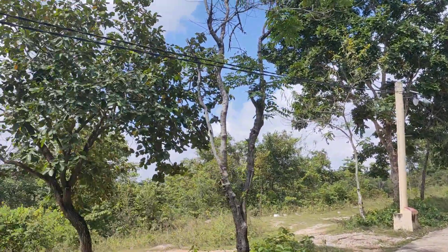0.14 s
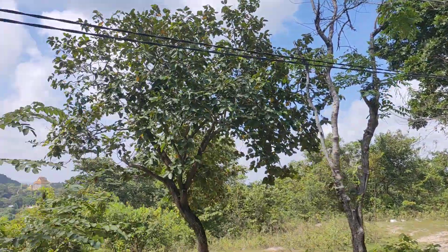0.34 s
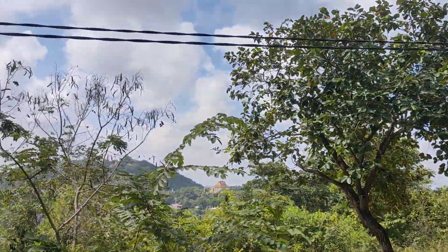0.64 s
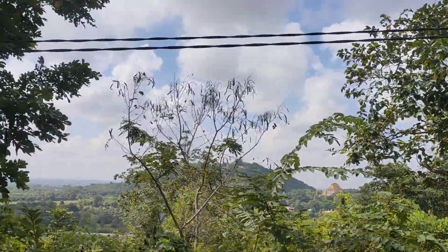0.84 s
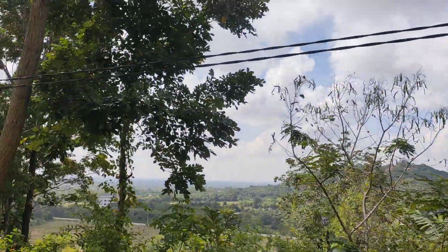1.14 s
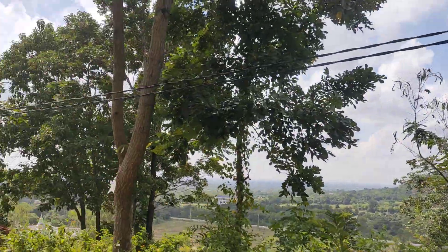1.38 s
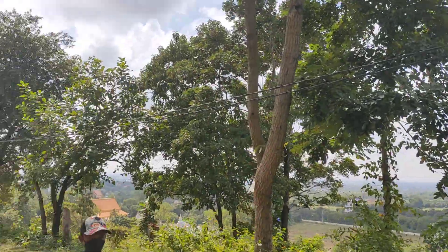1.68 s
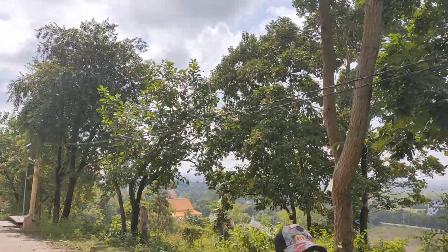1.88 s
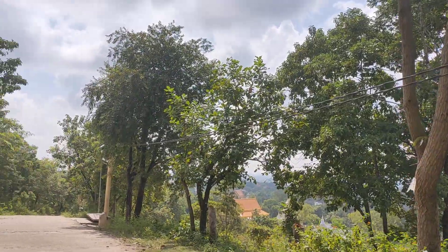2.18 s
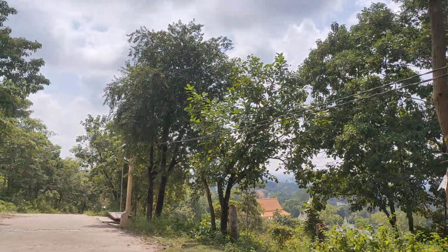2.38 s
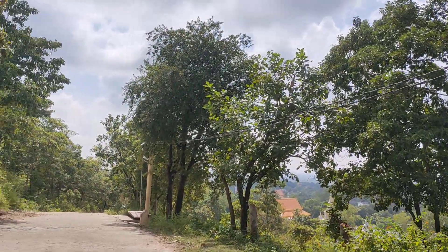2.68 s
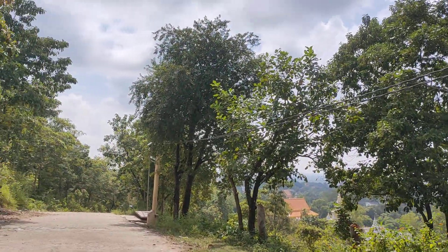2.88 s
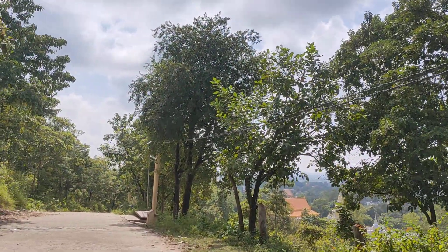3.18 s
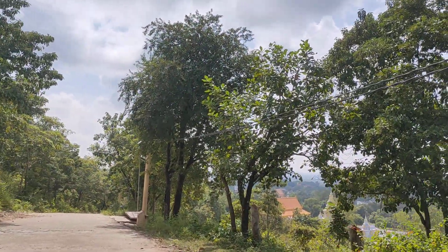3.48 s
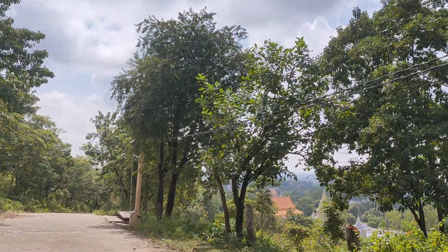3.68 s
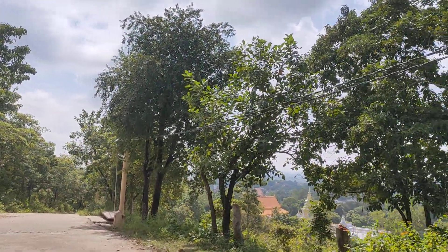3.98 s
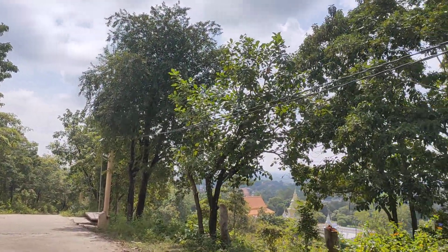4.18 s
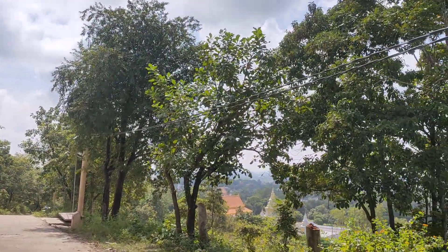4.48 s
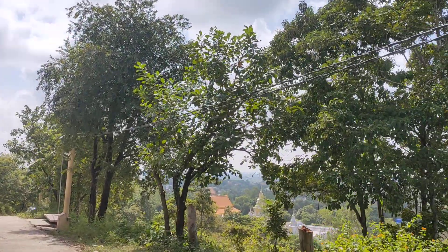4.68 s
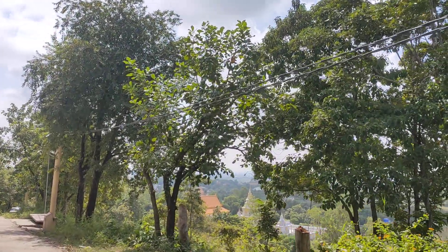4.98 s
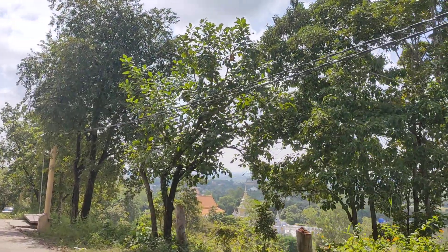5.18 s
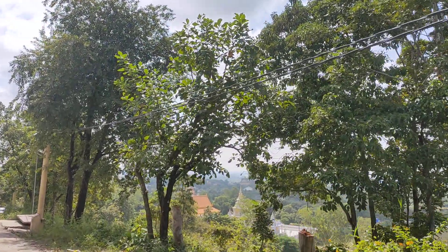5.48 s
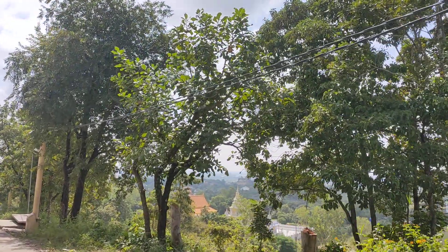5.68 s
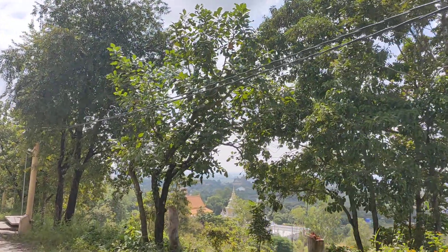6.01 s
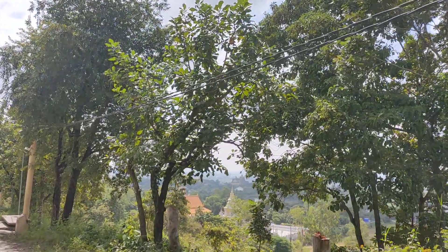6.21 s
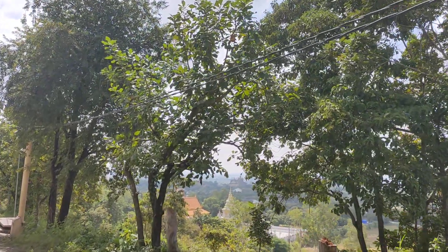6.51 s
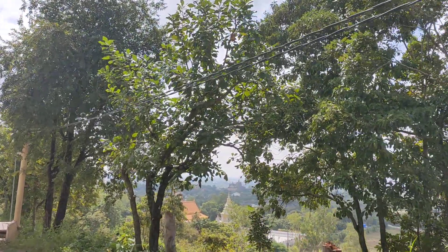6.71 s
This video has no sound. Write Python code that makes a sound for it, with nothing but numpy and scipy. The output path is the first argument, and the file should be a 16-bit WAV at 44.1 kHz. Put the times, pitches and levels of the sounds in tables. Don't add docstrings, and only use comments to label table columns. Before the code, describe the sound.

On an open hillside with far traffic, insects and a faint hum, a door slams almost at once. A parked engine thuds low and unevenly while a single-cylinder motorbike putters closer, slows, passes loudly just after two seconds, then opens the throttle and fades. Grit snaps under wheels near three seconds. A handheld stereo phone turns during the pass, with light wind buffets and slightly watery compressed treble.

```python
import sys
import numpy as np
from scipy import signal
from scipy.fft import rfft, irfft
from scipy.io import wavfile
from scipy.ndimage import uniform_filter1d, map_coordinates

SR = 44100
rng = np.random.default_rng(int(sys.argv[2]) if len(sys.argv) > 2 else 0)


def store_wav(level_fs):
    pcm = np.round(np.clip(np.atleast_2d(level_fs), -1, 1) * 32767)
    wavfile.write(sys.argv[1], SR, pcm.T.astype(np.int16))


def volts_from_decibels(level):
    exponent = np.asarray(level, float) / 20
    return 10 ** exponent


N = 302085
T = np.arange(N) / SR

# f/Hz, level/dB per Hz
HILL_SPECTRUM = [(15, -26.5), (25, -1), (43, -2.5), (134, 0), (217, -1.5), (277, -13), (476, -22.5),
                 (818, -10), (1890, -31.5), (2610, -27), (5000, -34), (8590, -27), (10700, -31),
                 (11900, -44.5), (16000, -77)]
# f/Hz, width/Hz, level/dB
MACHINE_HUM = [
    (814.6, 43, -57),
    (1032, 31, -62),
    (640, 39, -69),
]
# t/s, length/s, level/dB
WIND_GUSTS = [
    (.01, 0.019, -33.5),
    (2.86, 0.014, -37),
    (3.132, 0.058, -37.5),
    (5.09, 0.15, -45.5),
    (6.15, 0.047, -38),
    (6.825, 0.057, -42),
]
# t/s, delay of left port/ms, hiss left minus right/dB
BEARING_PATH = [(0, .32, 0.5), (.45, .38, 6.5), (.55, -0.48, 5.5), (1.2, -0.36, 4.5), (1.6, -0.19, 2),
                (2.1, 0.24, 1.5), (2.4, 0.36, -5), (2.65, .32, -2.5), (3.2, 0.19, -1.5), (4.5, .22, -1),
                (6.85, .25, -5)]
# t/s, f/Hz
ENGINE_SPEED = [(0, 22.62), (1.2, 22.23), (1.6, 21.51), (3.25, 20.16), (3.65, 23.89), (5.2, 23.59),
                (5.9, 24.51), (6.85, 23.07)]
# t/s, level/dB (about 0 at its closest), exhaust ring f/Hz
RIDE_PATH = [(0, -14.5, 117), (.5, -14.5, 138), (.95, -13.5, 154), (1.3, -11, 148), (1.6, -8.5, 136),
             (1.9, -4.5, 128.5), (2.15, 0, 124), (2.4, 1.5, 121), (2.65, -3, 117), (2.95, -8, 113),
             (3.3, -8.5, 114.6), (3.6, -9, 135), (4.1, -12, 131), (4.6, -13, 132), (5.2, -15.5, 147.4),
             (5.8, -16.5, 117.5), (6.4, -19, 130), (6.85, -21.5, 134)]
# t/s, level/dB
VALVE_LEVEL = [(3.0, -62), (3.65, -59.5), (4.0, -54.5), (4.4, -57), (4.9, -69)]
# f/Hz, level/dB per Hz
TYRE_SPECTRUM = [(150, -13.5), (300, 2.5), (500, 2.5), (800, -4), (1100, -3.5), (1600, -5), (2600, -11.5),
                 (4000, -26), (8000, -61)]
# f/Hz, level/dB per Hz
CASING_SPECTRUM = [(1470, -9), (2500, -2.5), (2700, -4), (3520, -4), (4020, -4), (4880, -5.5), (7770, 1),
                   (10600, -6.5), (12200, -10.5), (15200, -9.5), (16000, -4)]
# t/s, level/dB, centre f/Hz, width/Hz, decay/s
DOOR_HITS = [(.0, -52.5, 520, 395, .8), (.125, -45.5, 517, 500, 0.57), (.187, -38.5, 690, 880, 0.2),
             (.185, -53.5, 4000, 500, .4), (.213, -42.5, 2920, 2500, 0.14), (.284, -27, 490, 300, 0.4),
             (.283, -25, 320, 202, 0.21), (.284, -27, 724, 745, 0.24), (.284, -30.5, 3030, 5700, .087),
             (.284, -41.5, 7250, 5700, 0.61), (.3, -34.5, 2000, 2900, 0.36), (.325, -31.5, 640, 346, 0.15),
             (.345, -33, 2180, 2400, .12)]
# crest t/s, peak level/dB
ENGINE_THUDS = [(0.137, -19), (0.303, -20.5), (0.483, -19.5), (0.643, -27.5), (0.836, -18.5), (0.983, -29),
                (1.175, -19.5), (1.351, -23), (1.546, -21), (1.695, -25), (2.045, -21.5), (2.383, -40),
                (2.752, -20), (2.869, -25), (3.012, -32), (3.21, -28), (3.359, -17.5), (3.554, -20.5),
                (3.708, -19), (3.883, -20), (4.221, -21), (4.381, -22), (4.557, -22), (4.708, -31),
                (4.884, -29), (5.061, -23), (5.215, -32), (5.386, -30.5)]
# t/s, level/dB, centre f/Hz, width/Hz, decay/s
GRIT_CLICKS = [
    (2.733, -41, 3670, 494, 0.13),
    (3.161, -41, 5140, 1790, 0.039),
    (3.175, -41, 2170, 1470, 0.028),
    (3.1976, -29.5, 1440, 800, 0.026),
    (3.196, -44, 2980, 744, 0.21),
    (5.765, -47.5, 1860, 1510, 0.14),
]
# f/Hz, left minus right/dB
PORT_COLOUR = [(60, 0), (250, -1), (700, 0), (1500, -4), (3000, -0.5), (5500, -4.5), (9000, 1),
               (11000, 1.5), (14000, -6.5)]
# f/Hz, level/dB
SQUELCH_BAR = [(800, -25), (1400, -8), (2200, -2.5), (3200, -.8), (4500, -.3), (7000, .7), (10000, .6),
               (12500, .3), (15500, .7)]


def level(x, db):
    return x * volts_from_decibels(db) / np.sqrt(np.mean(x ** 2))


def curve(table):
    s, *columns = np.transpose(table)
    return [np.interp(T, s, c) for c in columns]


def shape(table, hz):
    at, db = np.transpose(table)
    return np.interp(np.log(hz + 1), np.log(at), db)


def ring(x, hz, width):
    return signal.lfilter(*signal.iirpeak(min(hz, .45 * SR), hz / width, fs=SR), x)


def ring_twice(x, hz, width):
    return ring(ring(x, hz, width), hz, width)


def highpass(order, hz):
    return signal.butter(order, hz, "high", fs=SR, output="sos")


def hiss(table, swell_db, flicker_db, patch_db):
    hz, _, z = signal.stft(rng.standard_normal(N), SR, nperseg=1024)

    def walk(count, size):
        w = rng.standard_normal((count, z.shape[1]))
        w = uniform_filter1d(uniform_filter1d(w, size), size)
        return w / w.std()

    band = np.clip(3 * np.log2(hz / 40 + 1), 0, 27).astype(int)
    db = swell_db * walk(count=1, size=20) + flicker_db * walk(count=1, size=3)
    db = db + patch_db * walk(count=28, size=4)[band]
    coloured = z * volts_from_decibels(shape(table, hz)[:, None] + db)
    return level(signal.istft(coloured, SR)[1][:N], 0)


def hiss_pair(*settings):
    return np.array([hiss(*settings) for _ in "LR"])


def ports(x, lag_ms):
    lag = lag_ms * SR / 2000
    return np.array([map_coordinates(x, [np.arange(N) - side * lag], order=3, mode="nearest")
                     for side in (1, -1)])


def pan(db):
    return volts_from_decibels(np.array([db, -db]).reshape(2, -1) / 2)


def hillside(lag_ms):
    near = signal.sosfilt(highpass(1, 110), hiss(HILL_SPECTRUM, 0.73, 0.28, 2.4))
    wide = signal.sosfilt(highpass(2, 550), hiss_pair(HILL_SPECTRUM, 0.59, 0.27, 0.79))
    hum = sum(level(ring_twice(rng.standard_normal(N), hz, width), db) for hz, width, db in MACHINE_HUM)
    return volts_from_decibels(-45.5) * ports(near, lag_ms) + volts_from_decibels(-52.0) * wide + ports(hum, lag_ms)


def wind():
    gain = volts_from_decibels(-54.0)
    for s, length, db in WIND_GUSTS:
        gain = gain + volts_from_decibels(db) * np.exp(-.5 * ((T - s) / length) ** 2)
    both, apart = rng.standard_normal(N), rng.standard_normal((2, N))
    return gain * level(ring_twice(.45 * both + apart, 60, 60), 0)


def exhaust(turns, near_db, ring_hz):
    chance = rng.standard_normal((200, 3))
    t = np.arange(int(.09 * SR)) / SR
    out = np.zeros(N + len(t))
    coast_s, throttle_s, edge_s = 2.2, 3.45, 0.087
    coasting = np.clip(np.minimum(T - coast_s, throttle_s - T) / edge_s, 0, 1)
    crack_db = -8 - 34 * coasting - 3 * (T > throttle_s)
    rise = 1 - np.exp(-(t / 0.0033) ** 2)
    sagging_t = 0.674 * t + 0.0058 * (1 - np.exp(-t / 0.012))
    shell = volts_from_decibels(-13.5) * np.sin(2 * np.pi * 44 * t) * np.exp(-t / 0.019)
    firings = np.interp(np.arange(1, int(turns[-1])), turns, T)
    for s, (late, size, tune) in zip(firings, chance):
        now = int(s * SR)
        hz = ring_hz[now] * (1 + 0.079 * tune)
        pipe = np.sin(2 * np.pi * hz * sagging_t) * np.exp(-t / 0.009)
        crack = volts_from_decibels(crack_db[now]) * np.sin(2 * np.pi * 255 * t) * np.exp(-t / 0.0076)
        i = int((s - .006 + .0003 * late) * SR)
        out[i:i + len(t)] -= volts_from_decibels(near_db[now] - 10.5 + size) * rise * (pipe + crack + shell)
    return out[:N]


def tread_roar(near_db):
    abreast = np.exp(-.5 * ((T - 2.03) / 0.19) ** 2)
    roar = volts_from_decibels(-53.5 + 0.29 * near_db) + volts_from_decibels(-41) * abreast
    return level(ring_twice(rng.standard_normal(N), 1040, 700), -4.1) * roar


def valve_ticks(since):
    metal = ring(ring(rng.standard_normal(N), 5700, 1100), 5600, 1200)
    return level(np.exp(-since / 0.078) * metal, 0) * volts_from_decibels(curve(VALVE_LEVEL)[0])


def motorbike(lag_ms, pan_db):
    turns = -.185 + np.cumsum(curve(ENGINE_SPEED)[0]) / SR
    near_db, ring_hz = curve(RIDE_PATH)
    since = (turns + 0.08) % 1
    throb = 1 + 0.22 * np.exp(-since / 0.33)
    tyres = throb * volts_from_decibels(-37.5 + 0.82 * np.interp(T + .12, T, near_db))
    casing = throb * volts_from_decibels(-35.5 + 1.018 * near_db) * pan(pan_db)
    body = exhaust(turns, near_db, ring_hz) + tread_roar(near_db)
    body += volts_from_decibels(-3.5) * tyres * hiss(TYRE_SPECTRUM, 1.0, 0.98, 3.8)
    direct = ports(body, lag_ms) + ports(valve_ticks(since), lag_ms) * pan(-3.5)
    direct += volts_from_decibels(-7.0) * casing * ports(hiss(CASING_SPECTRUM, 0.61, 0.58, 1.6), lag_ms)
    tyre_scatter = signal.sosfilt(highpass(3, 420), hiss_pair(TYRE_SPECTRUM, 0.83, 1.0, 1.5))
    scattered = volts_from_decibels(-8.0) * tyres * tyre_scatter
    scattered += volts_from_decibels(-0.5) * casing * hiss_pair(CASING_SPECTRUM, 0.14, 0.3, 1.8)
    return direct + scattered


def knocks(table, pan_db):
    out = np.zeros((2, N))
    t = np.arange(int(.25 * SR)) / SR
    for s, db, hz, width, t60 in table:
        both, apart = rng.standard_normal(len(t)), rng.standard_normal((2, len(t)))
        noise = np.array([np.roll(both, 15), both]) + 0.8 * min(hz / 900, 1) * apart
        envelope = np.minimum(t / 0.00025, 1) * 1000. ** (-t / t60)
        burst = level(ring_twice(noise, hz, width), db) * envelope
        i = int(s * SR)
        out[:, i:i + len(t)] += burst * pan(pan_db)
    return out


def door_slam():
    return knocks(DOOR_HITS, pan_db=-3.5)


def parked_engine():
    out = np.zeros(N)
    before, after = 1000, 2000
    t = np.arange(-before, after) / SR
    swell = np.exp(-.5 * (t / np.where(t < 0, 0.0045, 0.0075)) ** 2)
    for (s, db), tune in zip(ENGINE_THUDS, rng.standard_normal(len(ENGINE_THUDS))):
        hz = 105.2 * (1 + 0.065 * tune)
        i = int(s * SR)
        thud = swell * np.cos(2 * np.pi * hz * (t - 5 * t ** 2))
        out[i - before:i + after] += volts_from_decibels(db - 1.5) * thud
    echo = np.roll(out, int(0.044 * SR))
    return out + volts_from_decibels(-13.0) * echo


def grit():
    return knocks(GRIT_CLICKS, pan_db=-8)


def squelch(x):
    size, start = 1024, 480
    n, k = np.arange(2 * size) + .5, np.arange(size) + .5
    window = np.sin(np.pi * n / 2 / size)[:, None]
    basis = window * np.cos(np.pi / size * np.outer(n + size / 2, k)) * np.sqrt(2 / size)
    halves = np.pad(x, ((0, 0), (size - start, 2 * size)))
    halves = halves[:, :halves.shape[1] // size * size].reshape(2, -1, size)
    lines = halves[:, :-1] @ basis[:size] + halves[:, 1:] @ basis[size:]
    power = np.sum(lines ** 2, axis=0)
    around = uniform_filter1d(uniform_filter1d(power, size=81), size=2, axis=0)
    bar = around * volts_from_decibels(2 * shape(SQUELCH_BAR, k * SR / 2 / size))
    line = uniform_filter1d(power, size=3)
    patch = uniform_filter1d(uniform_filter1d(power, size=7), size=3, axis=0)
    keep = (line > bar) & (patch > .7 * bar)
    lines *= keep * np.sqrt(power.mean(axis=0) / np.mean(power * keep + 1e-18, axis=0))
    out = np.zeros_like(halves)
    out[:, :-1] += lines @ basis[:size].T
    out[:, 1:] += lines @ basis[size:].T
    return out.reshape(2, -1)[:, size - start:][:, :N]


def scene():
    lag_ms, pan_db = curve(BEARING_PATH)
    ambience = hillside(lag_ms) + wind()
    return ambience + motorbike(lag_ms, pan_db) + door_slam() + parked_engine() + grit()


def low_pass(x):
    return signal.sosfilt(signal.butter(12, 16560, fs=SR, output="sos"), x)


def record(dry):
    hz = np.fft.rfftfreq(N, 1 / SR)
    bass_cut = 1 / np.sqrt(1 + (36 / (hz + 1)) ** 22.0)
    top_cut = hz < 15750
    heard = irfft(rfft(dry) * pan(shape(PORT_COLOUR, hz)) * bass_cut * top_cut, N)
    offset = .0029
    return low_pass(squelch(heard) + offset)


dry = scene()
out = record(dry)
store_wav(out)
```